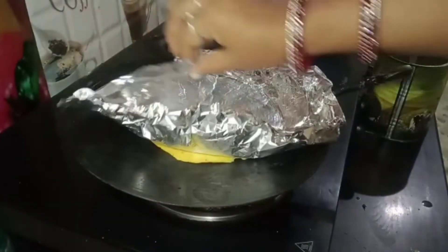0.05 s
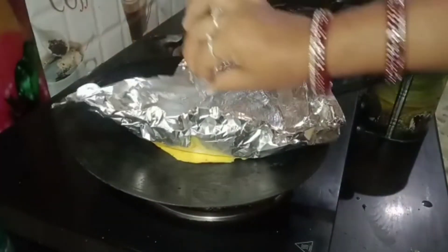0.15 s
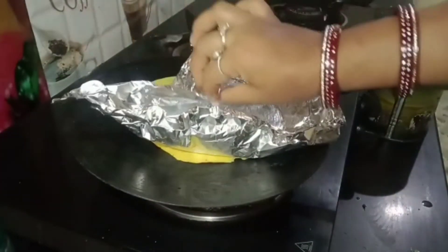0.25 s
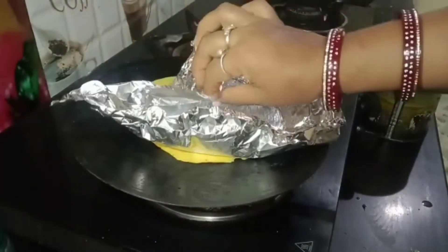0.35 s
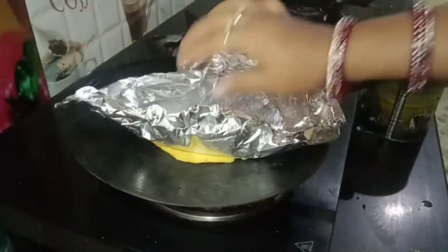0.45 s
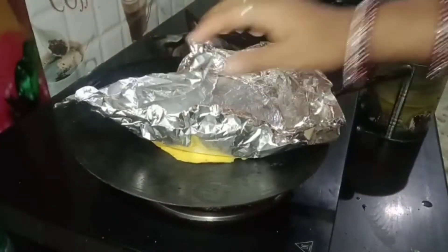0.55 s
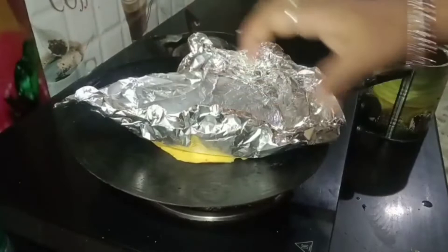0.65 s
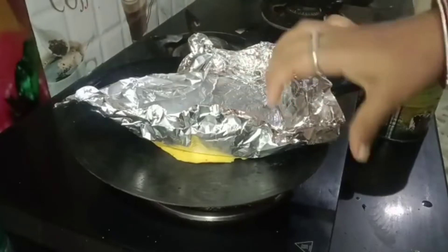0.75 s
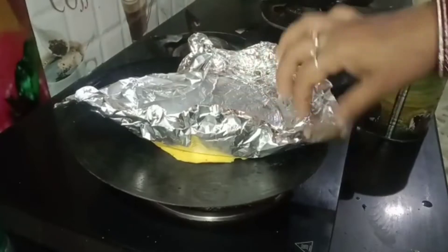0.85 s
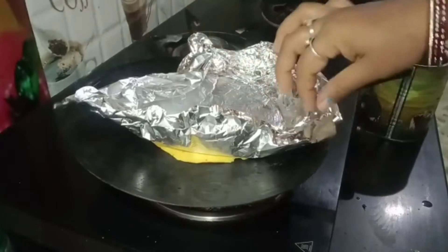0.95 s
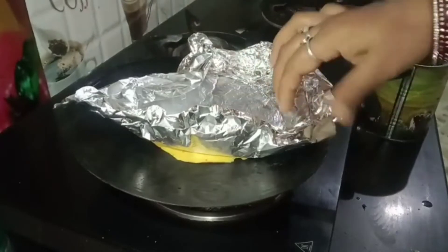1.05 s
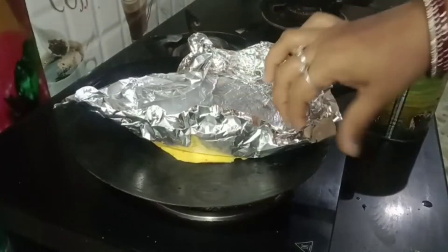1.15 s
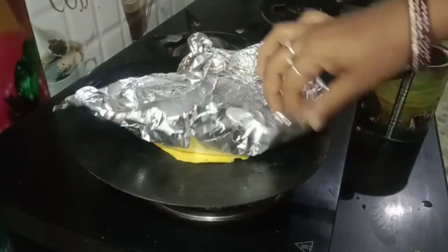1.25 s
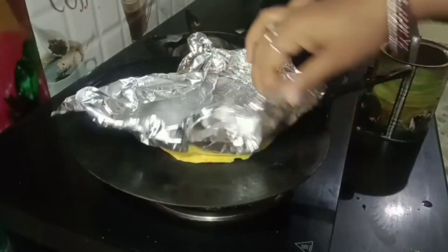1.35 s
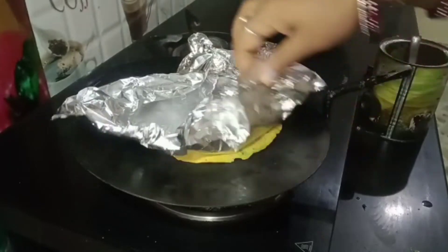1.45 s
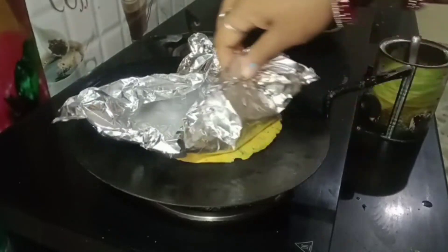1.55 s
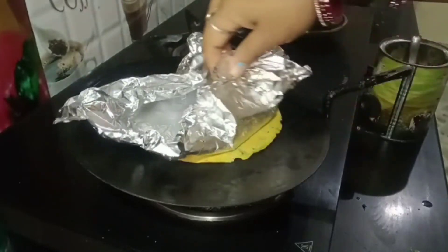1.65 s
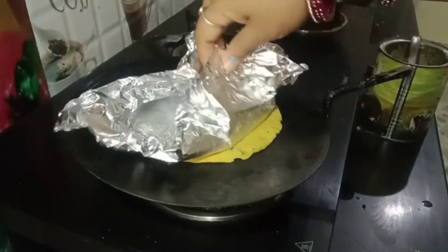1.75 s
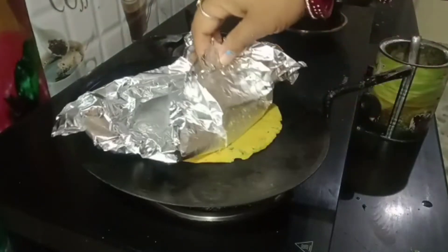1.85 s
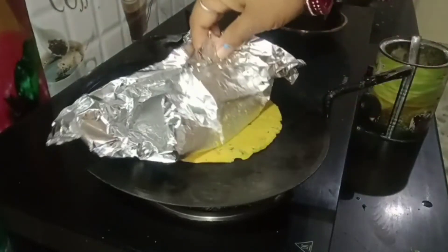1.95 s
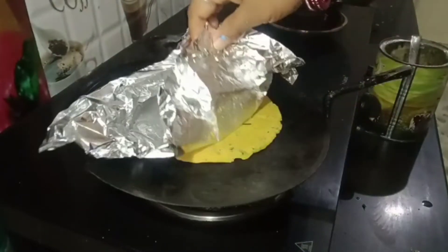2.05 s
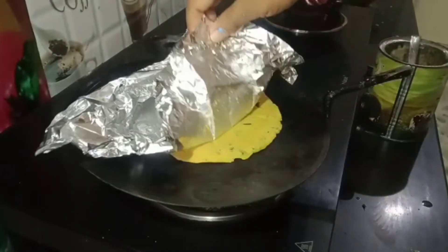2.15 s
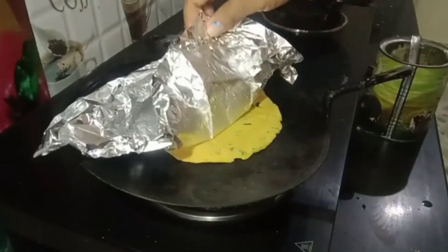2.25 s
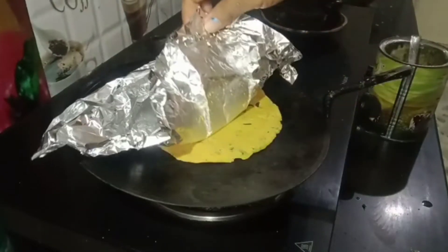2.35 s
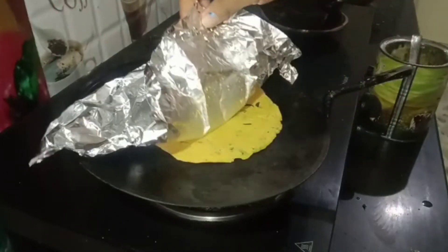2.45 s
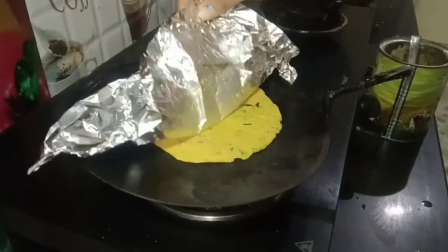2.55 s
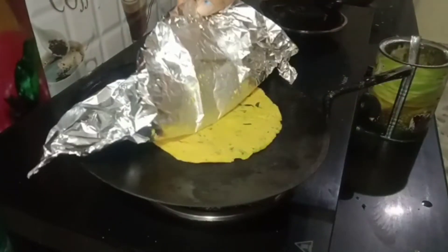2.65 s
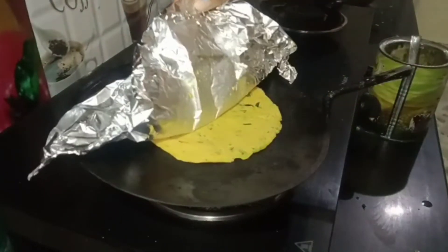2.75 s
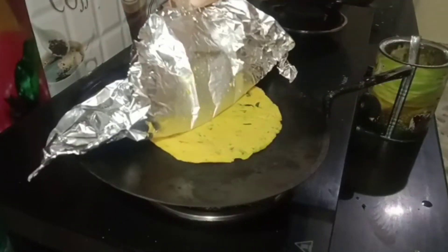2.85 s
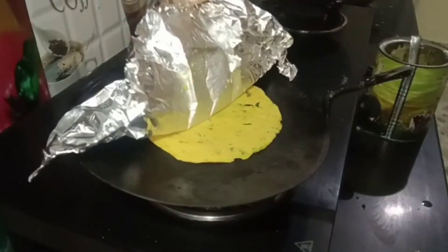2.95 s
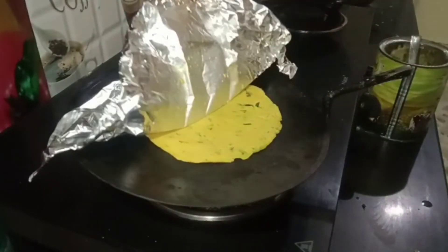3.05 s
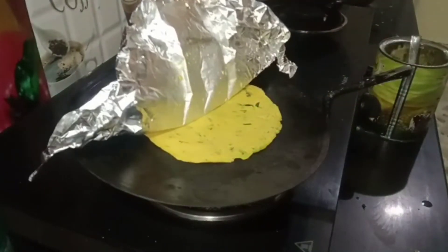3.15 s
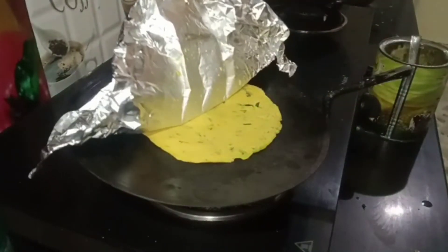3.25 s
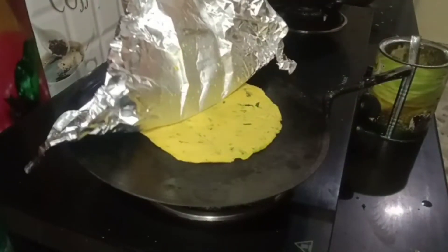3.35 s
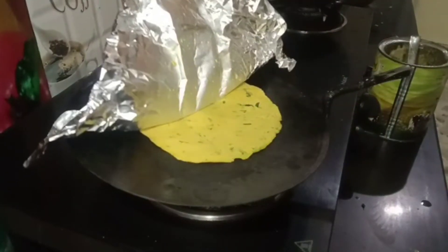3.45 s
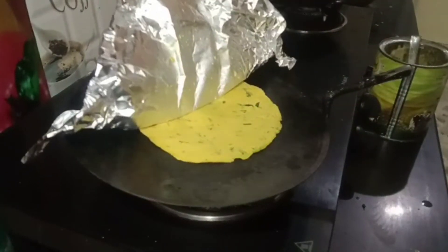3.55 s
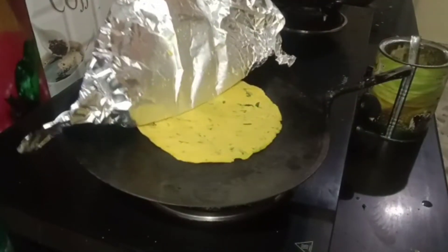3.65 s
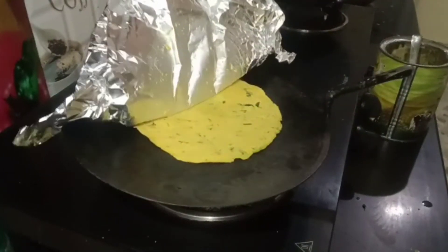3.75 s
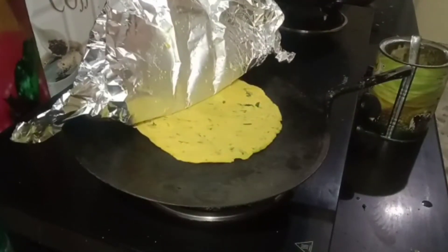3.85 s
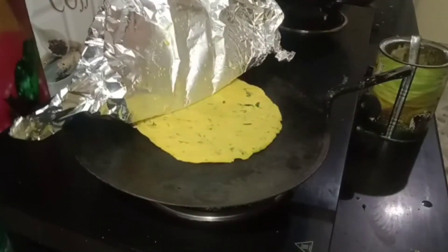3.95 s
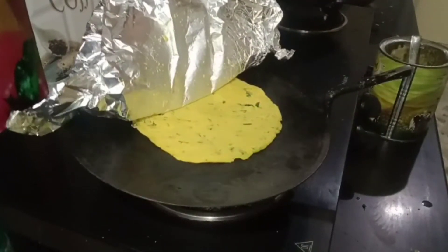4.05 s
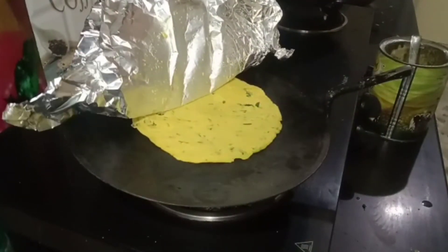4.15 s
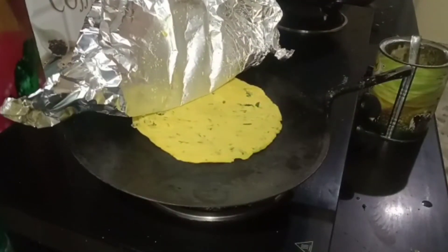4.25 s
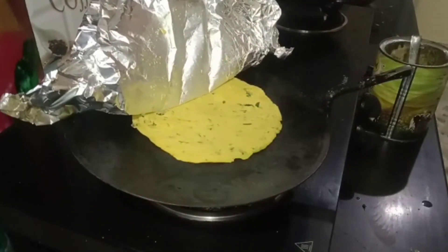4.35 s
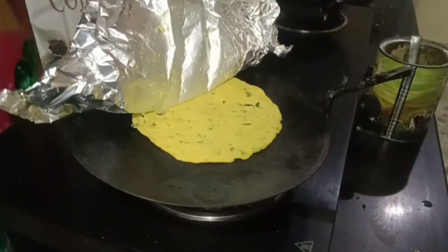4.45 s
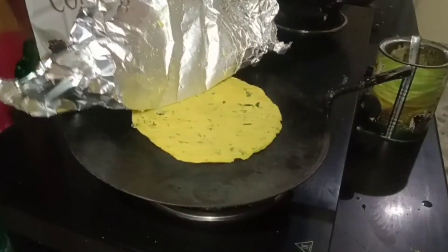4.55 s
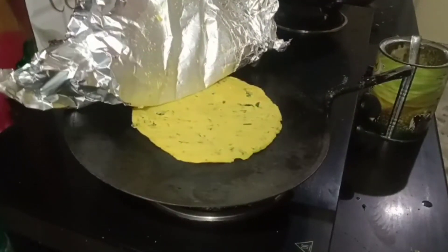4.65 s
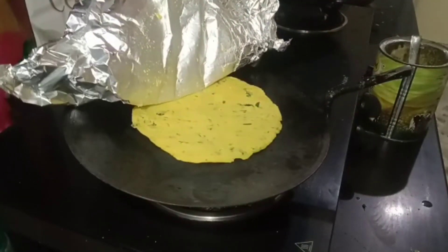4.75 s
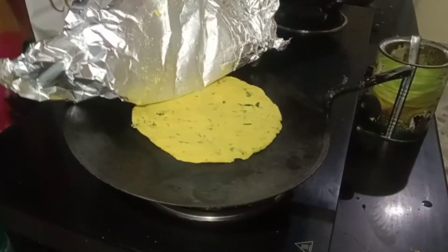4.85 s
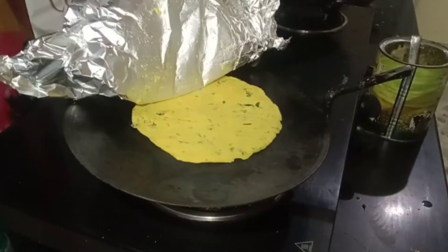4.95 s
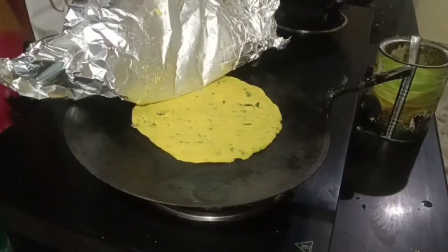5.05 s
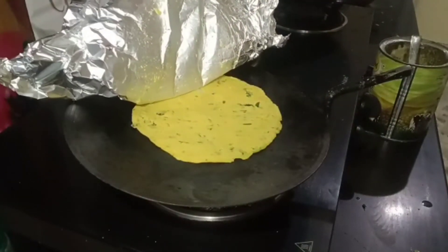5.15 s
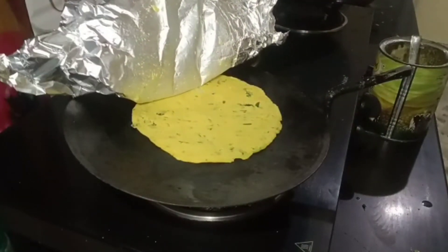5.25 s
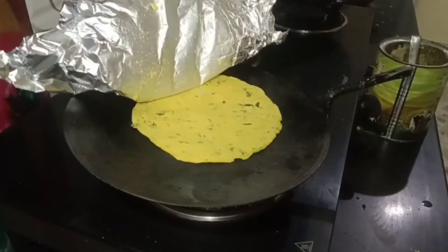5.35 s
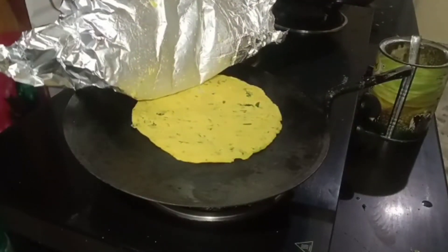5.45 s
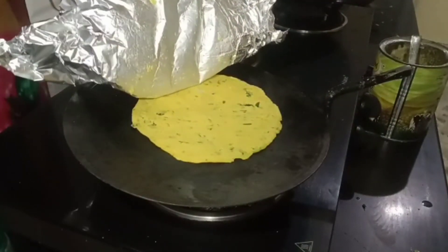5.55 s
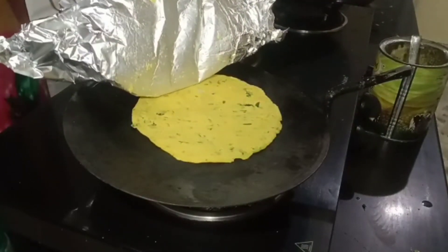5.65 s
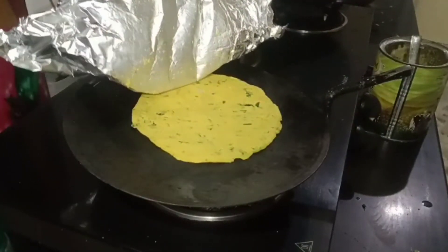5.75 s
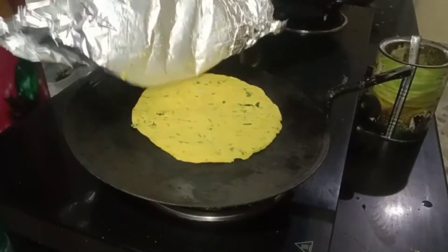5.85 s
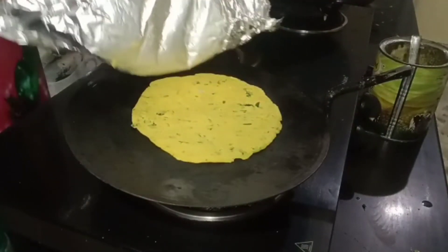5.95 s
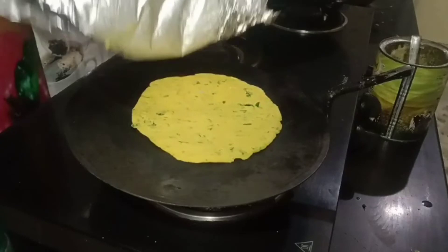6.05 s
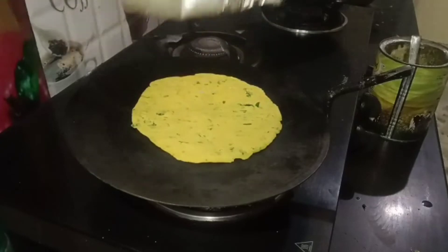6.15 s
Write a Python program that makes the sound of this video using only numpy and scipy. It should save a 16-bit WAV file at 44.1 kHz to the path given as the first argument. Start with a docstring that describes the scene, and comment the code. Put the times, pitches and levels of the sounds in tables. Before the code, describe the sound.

A hand brushes and grips crumpled aluminium foil with scratchy rustles and soft pan bumps. After a near pause, the sheet is peeled away in a dense, bright crackle full of sharp snaps and small tinny pops. A loose end briefly scrapes the pan, then lighter, hollow crinkles follow. Close microphone, small hard kitchen, faint low hum and hiss.

```python
"""Crackling foil and soft bumps: a hand grips a crumpled sheet of aluminium and peels it off a flatbread
on a griddle. Buckling patches are damped sines and dying noise: a dense crackle of tiny facets, rustling
folds and panels, creases that snap one by one, and wide panels that pop. Brushed wrinkles sizzle, and a
loose end scrapes the pan. Lifted clear, the curled sheet rings hollow through shifting resonant bands.
A small hard-walled kitchen answers with decaying noise, over a faint hum and hiss of coloured noise."""
import sys
import numpy as np
from scipy import signal
from scipy.fft import rfft, irfft, next_fast_len
from scipy.io import wavfile
from scipy.ndimage import uniform_filter1d

SR = 44100
rng = np.random.default_rng(int(sys.argv[2]) if len(sys.argv) > 2 else 0)


def transcribe(u):
    """Save the signal u as a 16-bit wav file named by the first command-line argument.

    u: samples, shape (n,) or (channels, n), limited to [-1, 1]; the rate is SR.
    q: integer samples, one column per channel.
    """
    v = np.clip(np.atleast_2d(u).T, -1, 1)
    q = np.round(v * 32767).astype(np.int16)
    wavfile.write(sys.argv[1], SR, q)


N = 273042

# Spectra of the sheet's patches, from large to tiny. Each row: frequency in Hz, relative level in dB.
PANEL_SPECTRUM = [(25, -32), (90, -9), (170, -16.5), (250, -12.5), (420, -14), (540, -16.5), (800, -5),
                  (1000, 1.5), (1250, 1), (1700, -0.5), (3000, -26)]
FOLD_SPECTRUM = [(60, -63.5), (300, -18), (700, -36), (1100, -7), (1300, -2.5), (1680, -2), (2100, -6.5),
                 (2500, -5.5), (3100, -1.5), (3600, -3.5), (4200, -9), (8000, -43)]
FACET_SPECTRUM = [(1800, -61), (2600, -14.5), (3100, -32), (3650, -8.5), (4150, -11.5), (5000, 0),
                  (5900, -0.5), (7100, -0.5), (8200, -12.5), (10500, -14.5), (13500, -49.5), (15500, -6.5)]
EDGE_SPECTRUM = [(1000, -69), (5000, -60.5), (8000, 5), (10000, 4.5), (13000, 10), (15500, 12.5)]

PANEL_RING_S = 0.045  # t60 of a ringing panel


def amp(db):
    """Decibels are twenty times the logarithm of a gain; this inverts them."""
    return 10 ** (np.asarray(db) / 20)


def unit(x):
    """Equal mean power: scale to rms 1."""
    return x / np.sqrt(np.mean(x ** 2) + 1e-20)


def along(points, hz):
    """Pitch is heard in ratios, so (Hz, value) points are joined on a log axis."""
    f, v = np.transpose(points)
    return np.interp(np.log(hz + 1), np.log(f + 1), v)


def filtered(x, response):
    """Linear filtering multiplies the spectrum by a response, here without phase shift."""
    m = next_fast_len(N + 8192)
    hz = np.fft.rfftfreq(m, 1 / SR)
    return irfft(rfft(x, m) * response(hz), m)[..., :N]


def coloured(x, spectrum, size=2048):
    """A causal minimum-phase filter follows from its magnitude alone, by folding the cepstrum."""
    magnitude = amp(along(spectrum, np.fft.rfftfreq(size, 1 / SR)))
    cepstrum = irfft(np.log(magnitude))
    cepstrum[1:size // 2] *= 2
    cepstrum[size // 2 + 1:] = 0
    impulse_response = irfft(np.exp(rfft(cepstrum)))
    return signal.fftconvolve(x, impulse_response)[:len(x)]


def high_passed(x, hz, order):
    """A Butterworth high-pass attenuates what lies below hz."""
    return signal.sosfilt(signal.butter(order, hz, "highpass", fs=SR, output="sos"), x)


def add(track, s, sound):
    """Superposition: mix a sound into the track at time s."""
    start = max(round(s * SR), 0)
    part = track[start:start + len(sound)]
    part += sound[:len(part)]


def burst(t60, size=4096):
    """Crowded modes of a thin sheet, struck once, merge into noise that dies exponentially."""
    return rng.standard_normal(size) * amp(-60 * np.arange(size) / SR / t60)


def facet(hz, t60, size=4096):
    """One damped resonance of a patch of foil: a sine with exponential decay."""
    t = np.arange(size) / SR
    return np.sin(2 * np.pi * hz * t) * amp(-60 * t / t60)


def varied(spectrum):
    """No two creases are alike: random geometry gives each its own strong and weak bands."""
    scatter_db = 4 * rng.standard_normal(len(spectrum))
    return [(hz, db + chance) for (hz, db), chance in zip(spectrum, scatter_db)]


def stroke(s, length, db):
    """Gain of one event: a quick linear attack, a hold, then exponential decay (a steady fall in dB)."""
    attack_s, release_db_per_s = 0.0056, 283
    t = np.arange(N) / SR - s
    return np.clip(t / attack_s, 0, 1) * amp(db - release_db_per_s * np.maximum(t - length, 0))


def resonate(x, response, count):
    """Time-varying convolution: each of count blocks excites a newly drawn impulse response."""
    out = np.zeros(N)
    hop = N // count + 1
    for start in range(0, N, hop):
        add(out, start / SR, signal.fftconvolve(x[start:start + hop], response()))
    return out


def crackle(spectrum, rate, spread_db, t60, centre_hz, ring_t60, ring, count=160, size=14000):
    """Stick-slip: patches buckle at random (Poisson) moments, each with its own pitch; rms 1."""
    pitches = centre_hz * np.exp(0.3 * rng.standard_normal(count))
    voices = [unit(burst(t60)) + ring * unit(facet(hz, ring_t60)) for hz in pitches]
    gaps, strengths = rng.standard_exponential((size, 2)).T
    times = np.cumsum(gaps) / rate  # rate in slips per second
    strengths = np.minimum(strengths, 3)
    patches = rng.integers(count, size=size)
    out = np.zeros(N)
    for s, strength, patch in zip(times, strengths, patches):
        if s < N / SR:
            add(out, s, amp(spread_db * strength) * voices[patch])
    out = coloured(out, spectrum)
    # the hand feeds in energy evenly, however it is shared among the slips
    local_power = np.abs(uniform_filter1d(out ** 2, size=1500))
    return unit(out / np.sqrt(local_power + 0.024 * np.mean(out ** 2)))


def ambience():
    """Steady noise shaped by its power spectrum: the low hum and faint hiss of the kitchen."""
    # Each row: frequency in Hz, relative level in dB.
    hum_and_hiss = [(25, -26), (65, -9.5), (95, -6.5), (125, -0.5), (190, -10.5), (350, -13.5), (660, -22),
                    (1400, -22.5), (2100, -27.5), (4200, -29), (5300, -30.5), (6650, -12.5), (7400, -20.5),
                    (7800, -16.5), (10400, -21), (11200, -42.5), (15500, -26.5)]
    return amp(-71.5) * unit(coloured(rng.standard_normal(N), hum_and_hiss))


def kitchen_tail(size=22050):
    """Diffuse reverberation is decaying noise; the bass of this small room lasts longest."""
    # Each row: frequency in Hz, reverberation time t60 in seconds.
    reverberation = [(120, 0.52), (500, 0.35), (1500, 0.21), (6000, 0.15), (10000, 0.24), (15000, 0.17)]
    hz, t, z = signal.stft(rng.standard_normal(size), SR, nperseg=256)
    onset = 1 - np.exp(-t / 0.00067)
    decay = amp(-60 * t / along(reverberation, hz)[:, None]) * onset
    tail = signal.istft(z * decay, SR, nperseg=256)[1]
    return tail / np.linalg.norm(tail)


def widening(x):
    """Decorrelation widens a sound: now and then scattered treble differs briefly between the sides."""
    # Each row: start in seconds, length in seconds, side over centre in dB.
    wide_moments = [(1.36, .02, -7), (2.132, .008, -4), (2.46, .008, -5), (2.549, .008, -4),
                    (3.119, .008, -5), (3.459, .008, -5), (3.968, .008, -5), (4.36, .008, -2),
                    (4.665, .012, -1), (4.873, .01, -4), (5.242, .008, -5), (5.739, .008, -6)]
    scatter = burst(0.006)
    scattered = signal.fftconvolve(x, scatter / np.linalg.norm(scatter))[:N]
    return sum(stroke(*row) for row in wide_moments) * high_passed(scattered, 4700, order=12)


def bumps(size=16000):
    """A soft contact excites a damped mode of the pan; the lower it is, the gentler its start."""
    # Bumps of hand and sheet. Each row: start in seconds, level in dB, pitch in Hz, t60 in seconds.
    contacts = [(.003, -46, 368, 0.15), (0.021, -45, 245, 0.072), (0.089, -56, 91.8, 0.74),
                (0.225, -36, 482, 0.12), (.228, -38, 955, 0.11), (.92, -50, 580, 0.29),
                (0.925, -62.5, 131, 0.35), (1.352, -49.5, 621, .3), (1.466, -39, 312, 0.15),
                (1.516, -47.5, 300, 0.052), (1.805, -46.5, 264, 0.15), (1.94, -56.5, 132, 0.28),
                (2.24, -47, 96, 0.16), (2.501, -57.5, 416, 0.35), (3.3, -52, 78, 0.14),
                (4.046, -49.5, 85, 0.096), (4.611, -64.5, 461, 0.84), (5.931, -62, 234, 0.41)]
    rise_cycles, flutter_share = 0.4, 0.9
    out, t = np.zeros(N), np.arange(size) / SR
    for s, db, hz, t60 in contacts:
        band = [(hz / 2, -35), (hz * .8, 0), (hz * 1.2, 0), (hz * 1.7, -30), (hz * 4, -70)]
        flutter = unit(coloured(rng.standard_normal(size), band))
        note = facet(hz, t60, size=size) + flutter_share * flutter * amp(-60 * t / t60)
        add(out, s, amp(db) * note * (1 - np.exp(-t * hz / rise_cycles)))
    return out


def drag():
    """Stick-slip friction: the loose end catches and slips on the pan with a hollow rasp."""
    # Each row: time in seconds, level in dB.
    drag_level = [(4.1, -59), (4.19, -39.5), (4.24, -46), (4.3, -45), (4.37, -50.5), (4.43, -50.5)]
    # Each row: frequency in Hz, relative level in dB.
    scrape_spectrum = [(600, -39), (1100, -16), (1450, -0.5), (1750, -3), (2200, -20.5), (4000, -53)]
    level_db = np.interp(np.arange(N) / SR, *np.transpose(drag_level), left=-120, right=-120)
    rasp = crackle(scrape_spectrum, rate=400, spread_db=3.5, t60=0.024, centre_hz=1573,
                   ring_t60=PANEL_RING_S, ring=0.25, count=40)
    return amp(level_db) * rasp


def brush():
    """Friction over fine wrinkles: sliding fingertips raise a rapid, scratchy sizzle of impacts."""
    # Each row: start in seconds, length in seconds, level in dB.
    strokes = [(-.02, 0.044, -38.5), (0.058, 0.25, -46), (0.138, 0.096, -42.5)]
    # Each row: frequency in Hz, relative level in dB.
    wrinkle_spectrum = [(1200, -35), (2400, 0), (3100, 6), (3700, 2.5), (4600, 0), (8000, 0.5),
                        (10000, -9.5), (13000, -4), (15500, 1.5)]
    pressure = np.sqrt(sum(stroke(*row) ** 2 for row in strokes))
    return pressure * crackle(wrinkle_spectrum, rate=1600, spread_db=4, t60=0.014, centre_hz=2860,
                              ring_t60=0.0052, ring=0.183)


def curl(size=1500):
    """Resonances of the hanging sheet favour hollow bands; each bend shifts and reweights them."""
    # Each row: band centre in Hz, mean level in dB.
    hollow_bands = [(330, 6), (610, -1), (900, -2), (1330, -5), (1680, 1), (2450, 1), (3030, -3),
                    (3680, -4)]
    width_hz, scatter_db, shift_share = 190, 2, 0.022
    t = np.arange(size) / SR
    damping = np.pi * width_hz
    # small facets above 4770 Hz sound freely
    out = high_passed(signal.unit_impulse(size), 4770, order=6)
    for (hz, db), (shift, weight) in zip(hollow_bands, rng.standard_normal((len(hollow_bands), 2))):
        ring = np.exp(-damping * t) * np.cos(2 * np.pi * hz * (1 + shift_share * shift) * t)
        out += amp(db + scatter_db * weight) * 2 * damping / SR * ring
    return out


def lifted(x):
    """Equal-power crossfade to the resonant colour of the curl as the sheet comes clear of the pan."""
    clear_from_s, clear_by_s = 4.74, 4.87
    free = np.clip((np.arange(N) / SR - clear_from_s) / (clear_by_s - clear_from_s), 0, 1)
    return np.sqrt(1 - free) * x + np.sqrt(free) * resonate(x, curl, count=45)


def sheet_ring(size=11000, count=5):
    """Modal ringing of the whole sheet; creases split each mode into a cluster that shifts as it bends."""
    # Each row: mode frequency in Hz, mean level in dB, t60 in seconds.
    sheet_modes = [(591, 5, 0.089), (790.4, 3.5, 0.072), (1002, -12.5, 0.16), (1295, -3, 0.11),
                   (1629, -1, 0.095), (1822, -9.5, 0.11), (2416, -8, 0.23), (3087, 4, 0.033),
                   (3660, -10, 0.13), (5020, -15.5, 0.32), (5580, -7.5, 0.26), (5970, -9, 0.061),
                   (6660, -18.5, 0.47), (7100, -13, 0.092)]
    split, scatter_db = 0.011, 3  # relative detuning, level scatter
    t = np.arange(size) / SR
    out = np.zeros(size)
    for hz, db, t60 in sheet_modes:
        bend, phase = rng.standard_normal((2, count, 1))
        cluster = np.sin(2 * np.pi * hz * (1 + split * bend) * t + np.pi * phase).sum(axis=0)
        out += amp(db + scatter_db * rng.standard_normal() - 60 * t / t60) * cluster
    return out / np.linalg.norm(out)


def flexing():
    """Incoherent forces add in power: the pull and the tugs drive facets, folds and panels."""
    # The pull that peels the sheet off. Each row: time in seconds, crackle drive in dB.
    pull = [(1.17, -74), (1.23, -48), (1.4, -34.5), (1.62, -43.5), (1.92, -35.5), (2.4, -42), (2.78, -39),
            (2.92, -53), (3.04, -42), (3.45, -45), (3.9, -52), (4.25, -39.5), (4.43, -55), (4.62, -58),
            (4.87, -53.5)]
    # The larger patches sound more as the peel goes on, then less as the sheet comes clear. # Each row: time in
    # seconds, fold drive and panel drive in dB over the crackle.
    larger_patches = [(1.3, -5, -14), (3.9, 0, -1.5), (4.8, -6, -20)]
    # Grips and tugs. Each row: start in seconds, length in seconds, crackle drive in dB,
    # fold drive and panel drive in dB over the crackle.
    flexes = [(-.02, 0.098, -39.5, -2.5, -13.5), (0.17, 0.11, -40.5, -1.5, -14.5),
              (.32, 0.13, -53.5, -3, -6.5), (0.412, 0.035, -43, -2, -8), (0.869, 0.096, -43.5, -1, -9),
              (0.911, 0.013, -34, -11, -9), (0.989, 0.043, -48.5, -0.5, -5.5), (1.244, 0.052, -42, -8, -37),
              (1.342, 0.19, -43, -10, -4.5), (1.721, 0.013, -32.5, -4, -16), (1.793, 0.015, -32, -1, -7.5),
              (1.98, 0.082, -34, -6.5, -13), (2.14, 0.035, -42, -16, 1), (2.26, 0.087, -49, -10, 0),
              (2.438, 0.076, -42, -1, -5.5), (2.98, 0.025, -49, -16, -4), (3.279, 0.049, -37, -1, -6.5),
              (3.386, 0.029, -35.5, -4, -6.5), (3.631, 0.017, -36, -2.5, -4),
              (3.68, 0.046, -41.5, -1.5, -6), (3.963, 0.16, -49.5, -2, -2), (4.267, 0.11, -43, 2, -0.5),
              (4.455, 0.049, -39.5, -2.5, -19), (4.551, 0.14, -38.5, -2, -11.5),
              (4.701, 0.056, -44, -4.5, -32), (4.872, 0.054, -39.5, -7, -20),
              (5.201, 0.115, -49, -4, -11.5), (5.398, 0.1, -46, -3, -16), (5.579, 0.0067, -41, 1, -16.5),
              (5.682, 0.061, -41.5, -1.5, -19.5), (5.789, 0.12, -44.5, -3, -17.5),
              (5.813, 0.032, -41.5, -21, -11.5), (5.95, 0.085, -63, -13, -19)]
    t = np.arange(N) / SR
    pull_db = np.interp(t, *np.transpose(pull), left=-120, right=-120)
    times, *larger = np.transpose(larger_patches)
    power = amp([pull_db] + [pull_db + np.interp(t, times, db) for db in larger]) ** 2
    for s, length, db, fold_db, panel_db in flexes:
        power += np.outer(amp([0, fold_db, panel_db]) ** 2, stroke(s, length, db) ** 2)
    return np.sqrt(power)


def sheet(effort, fold_drive, panel_drive):
    """Buckling scales with size: larger patches of the flexing foil sound lower."""
    fine = crackle(FACET_SPECTRUM, rate=800, spread_db=4.0, t60=0.022, centre_hz=5965,
                   ring_t60=0.022, ring=0.64)
    middling = crackle(FOLD_SPECTRUM, rate=600, spread_db=2.0, t60=0.026, centre_hz=2191.5,
                       ring_t60=0.05, ring=0.47)
    wide = crackle(PANEL_SPECTRUM, rate=400, spread_db=5.5, t60=0.0064, centre_hz=895.6,
                   ring_t60=PANEL_RING_S, ring=0.36)
    tiny = crackle(EDGE_SPECTRUM, rate=560, spread_db=3.5, t60=0.019, centre_hz=12660,
                   ring_t60=0.0068, ring=0.17)
    # hard flexing also sets off the tiniest wrinkles: 0.71 dB more treble per dB of effort
    brightness = (effort / amp(-41.5)) ** 0.71
    small = effort * (fine * amp(-2.5) + tiny * amp(-15.5) * brightness)
    return small + fold_drive * middling * amp(-6) + panel_drive * wide * amp(-2.5)


def pops():
    """Snap-through of a wide panel: a few low cycles and a short shudder of the sheet."""
    # Each row: start in seconds, relative level in dB, pitch in Hz.
    panel_flips = [(1.3524, -27, 1080), (1.376, -35, 940), (1.4093, -28.5, 950), (1.452, -33, 1100),
                   (1.516, -32, 887), (1.7364, -36, 1300), (2.287, -33, 1560), (3.283, -50, 1570),
                   (4.183, -52, 1480), (4.199, -53.5, 1446), (4.296, -35.5, 990), (4.302, -43, 1310)]
    trim_db, flip_t60_s, shudder_t60_s = -21.5, 0.029, 0.061
    out = np.zeros(N)
    for s, db, hz in panel_flips:
        flip = unit(facet(hz, flip_t60_s)) + 1.44 * unit(coloured(burst(flip_t60_s), PANEL_SPECTRUM))
        shudder = unit(coloured(burst(shudder_t60_s), PANEL_SPECTRUM))
        add(out, s, amp(db + trim_db) * (flip + shudder))
    return high_passed(out, 580, order=2)


def snap(hz, fold_db, edge_db):
    """Snap-through of a crease: a tick and a crack near its facet's pitch, then a spread into the folds."""
    crack_t60_s, crack_rise_s = 0.0105, 0.00054
    # the facet's own spectrum falls 9 dB per octave away from its pitch
    own = [(f, db - 9 * abs(np.log2(f / hz))) for f, db in varied(FACET_SPECTRUM)]
    crack = 0.6 * unit(coloured(burst(crack_t60_s), own)) + 0.63 * unit(facet(hz, crack_t60_s))
    spread = 0.55 * unit(coloured(burst(0.048), own)) + 0.12 * unit(facet(hz, 0.05))
    tick = amp(edge_db - 8) * unit(burst(0.003))
    fold_noise = coloured(burst(0.045), varied(FOLD_SPECTRUM))
    folds = amp(fold_db - 8.0) * unit(high_passed(fold_noise, 600, order=3))
    edge = amp(edge_db - 0.5) * unit(coloured(burst(0.042), EDGE_SPECTRUM))
    rise = 1 - np.exp(-np.arange(len(crack)) / SR / crack_rise_s)
    sharp = high_passed(tick + rise * (crack + spread), 2540, order=2)
    return amp(-12.5) * (sharp + rise * (folds + edge))


def lesser_snaps(effort, count=200):
    """Random smaller snap-throughs at uneven intervals, as loud as the sheet is flexed hard."""
    rate_per_s, level_spread_db = 30, 2.5
    centre_hz, pitch_spread = 6260, 0.091  # the spread is in log frequency
    mean_fold_db, mean_edge_db, colour_spread_db = -9, -8.5, 6
    out = np.zeros(N)
    times = (np.arange(count) + rng.random(count)) / rate_per_s
    for s, (strength, pitch, fold, edge) in zip(times, rng.standard_normal((count, 4))):
        sound = snap(centre_hz * np.exp(pitch_spread * pitch),
                     mean_fold_db + colour_spread_db * fold,
                     mean_edge_db + colour_spread_db * edge)
        if s < N / SR:
            add(out, s, effort[int(s * SR)] * amp(level_spread_db * strength) * sound)
    return out


def snaps():
    """Stored bending energy is released crease by crease, each loud snap at its own moment."""
    # Each row: start in seconds, relative level in dB, pitch of the facet in Hz,
    # relative levels of the folds and of the treble edge in dB.
    creases = [(0.072, -36.5, 5830, -2, -3), (.156, -35, 7100, 1, -1.5), (0.179, -44, 6100, 4, -16),
               (0.188, -27.5, 3430, -4.5, -6.5), (0.3005, -31.5, 5870, -4, -8),
               (0.368, -43, 7100, -20, -14), (0.4074, -34.5, 6040, -3.5, -6),
               (0.428, -35.5, 6360, -0.5, -0.5), (0.585, -56, 6500, -35, -6), (.722, -62, 6870, -32, -10),
               (0.875, -44, 5860, -30, -3), (.899, -34, 6040, -5, -5), (.919, -28.5, 6400, -0.5, -14),
               (0.925, -29.5, 6400, -4, -2), (1.012, -43.5, 6460, 3, -3), (1.225, -45, 6000, -20, -3),
               (1.282, -39, 5430, 3, -6), (1.341, -25, 5670, -4, -9), (1.355, -29, 5570, -6.5, 1),
               (1.376, -28, 5660, 0.5, -3.5), (1.4334, -26, 6840, -11, -7), (1.4423, -33, 6200, -22, 1),
               (1.4535, -27, 6040, -3, -10), (1.471, -26, 5550, -4, -18), (1.5026, -26, 6300, -3.5, -13),
               (1.578, -30, 5100, -14, -8), (1.6148, -33, 4800, -20, -19), (1.659, -31.5, 6800, -6, -11),
               (1.68, -33, 7000, 1, -1), (1.698, -33.5, 6500, -6, -8), (1.7332, -24, 6440, -2.5, -6),
               (1.7752, -29, 4860, -4, -25), (1.799, -16.5, 5500, -5.5, -20), (1.835, -24.5, 6140, -5, -18),
               (1.868, -28.5, 7040, -0.5, -10), (1.8814, -28, 6400, 0, -1), (1.891, -30, 6760, 1, -12),
               (1.909, -29.5, 5650, -8, -17), (1.9416, -28, 6000, 0, -5.5),
               (1.9699, -25.5, 6160, -5.5, -17), (1.996, -27.5, 5020, 0, -8), (2.005, -31, 7000, 2, -2),
               (2.0394, -32, 7600, -15, -9), (2.136, -31.5, 5900, -1, 0), (2.145, -30, 7150, -28, -17),
               (2.1492, -24.5, 6700, -2.5, -8), (2.1754, -31, 5800, 1, -16), (2.19, -31.5, 6460, -5, -6),
               (2.2205, -30.5, 6450, -1.5, -18), (2.258, -28, 5900, -1.5, -8),
               (2.286, -29.5, 5370, -2, -15), (2.301, -25, 5980, -5, -10), (2.315, -30, 5050, 2, -5),
               (2.38, -28, 6370, -2.5, -8.5), (2.4395, -33, 6050, 0, -6), (2.4622, -28.5, 7300, -18, -22),
               (2.4992, -28, 6550, 3.5, -8), (2.53, -25, 6720, -3, -25), (2.551, -29.5, 5900, -1.5, -17),
               (2.603, -33.5, 4970, -13, -10), (2.6278, -33, 6460, -1.5, -10), (2.694, -38, 6800, 7, -17),
               (2.722, -34, 6100, -17, -5), (2.764, -34.5, 4760, 5.5, -2), (2.821, -35.5, 6500, 2.5, -5),
               (2.8353, -44.5, 3560, 13, -12), (2.8943, -36.5, 6100, -7, -15), (2.953, -42, 6900, 2, -10),
               (2.9863, -30, 5500, -1, -9), (3.001, -28, 6230, -22, 1), (3.043, -31.5, 6500, -22, -8),
               (3.087, -34.5, 5500, 3.5, -7), (3.121, -32, 6740, -1, 2), (3.1528, -31, 5380, -8, -8),
               (3.2057, -27, 5870, -9, -14), (3.224, -30.5, 7000, -17, -17), (3.281, -23, 5640, -2.5, -12),
               (3.296, -26, 6160, -8, -11), (3.3092, -37, 6400, -12, 1), (3.317, -23.5, 5750, -6, -24),
               (3.329, -30.5, 5760, 2, -20), (3.363, -25.5, 5560, -5.5, -33), (3.4049, -30, 5870, 3, -24),
               (3.449, -35.5, 7100, -6, -5), (3.462, -34, 5580, -1, -1.5), (3.519, -37.5, 6350, 7.5, -13),
               (3.532, -38, 5030, -2, -16), (3.575, -40, 6900, -7, -17), (3.595, -41, 4940, 5, -13),
               (3.647, -30, 6010, 2.5, -18), (3.6796, -30, 5030, -23, -14), (3.6954, -31, 6100, -7, -12),
               (3.7246, -42, 5560, 1, -15.5), (3.7548, -31.5, 5800, -3.5, -29),
               (3.845, -36.5, 5440, -11, -22.5), (3.872, -45, 5400, 10, -7.5),
               (3.886, -38.5, 5100, 0, -17.5), (3.91, -45, 6300, -8, -6), (3.954, -43, 6500, -15, -8),
               (3.9735, -33, 5550, -6, -7), (3.994, -33.5, 6000, 3, -5.5), (3.998, -33, 5500, -13, -25),
               (4.026, -42.5, 4870, 8, -23), (4.0647, -38, 5800, -12, -27), (4.134, -36.5, 6060, -10, -13),
               (4.2238, -26, 6600, -17, -25), (4.265, -27, 4920, -27, -7.5), (4.363, -40, 5300, -6, 9),
               (4.3666, -37, 5700, -10, -13.5), (4.4694, -31.5, 6170, -6, -10.5),
               (4.5156, -37, 5600, -8.5, -27), (4.5494, -32.5, 5660, -1, -14),
               (4.575, -30.5, 5850, 3.5, -12.5), (4.669, -24.5, 5350, -4.5, -31),
               (4.877, -49, 6200, -22, -33), (4.9025, -41, 5900, -13, -1), (4.989, -53.5, 6570, -18, -20),
               (5.226, -44, 6050, -7, -5), (5.243, -43, 5700, -3, -6), (5.2873, -46, 5440, -19, -10),
               (5.3795, -34, 5600, -11, -17), (5.405, -31, 5620, -23, -23), (5.4286, -36, 5950, 1, -14),
               (5.4805, -38, 5100, -22, -16), (5.5318, -41, 5760, -11, -29), (5.571, -38.5, 5900, -12, -6),
               (5.5896, -35, 4930, 0.5, -4.5), (5.6896, -37, 5650, -21, -32),
               (5.695, -35.5, 6300, -17, -27), (5.74, -34, 4400, -2, -6.5), (5.7733, -41, 6300, 2, -9),
               (5.819, -31, 6800, 0.5, -24), (5.831, -33, 4600, -2.5, -6), (5.8581, -38.5, 6160, 1, -15),
               (5.912, -44, 5900, -14, -12), (5.9387, -25, 6710, -25, -14), (6.057, -52.5, 6730, -27, 2),
               (6.111, -57.5, 6720, -20, -9), (6.176, -45, 6730, -33, -24)]
    out = np.zeros(N)
    for s, db, hz, fold_db, edge_db in creases:
        add(out, s, amp(db) * snap(hz, fold_db, edge_db))
    return out


def scene():
    """Mid-side superposition: foil and pan lie straight ahead; reverberation and some treble spread."""
    # Each row: frequency in Hz, side level of the reverberation in dB.
    side_width = [(3000, -81.5), (4500, -61.5), (7000, -52.5), (15000, -33.5)]
    effort, fold_drive, panel_drive = flexing()
    buckling = sheet(effort, fold_drive, panel_drive) + snaps() + pops() + lesser_snaps(effort)
    crinkles = lifted(buckling) + brush() + drag()
    ringing = amp(-15.0) * resonate(crinkles, sheet_ring, count=30)
    direct = crinkles + ringing + bumps()
    mid = direct + amp(-9.5) * resonate(direct, kitchen_tail, count=20) + ambience()
    side_tail = resonate(direct, kitchen_tail, count=12)
    side = filtered(side_tail, lambda hz: amp(along(side_width, hz))) + widening(direct)
    return np.array([mid + side, mid - side])


def record(dry):
    """Band limiting: the microphone sheds the deepest bass and cuts steeply above its top."""
    low_hz, top_hz = 45, 15550
    return filtered(dry, lambda hz: hz / np.hypot(hz, low_hz) / np.hypot(1, (hz / top_hz) ** 150))


dry = scene()
out = record(dry)
transcribe(out)
```